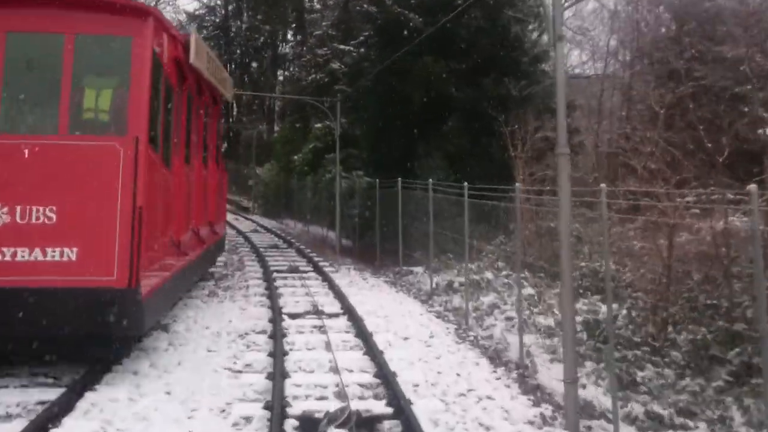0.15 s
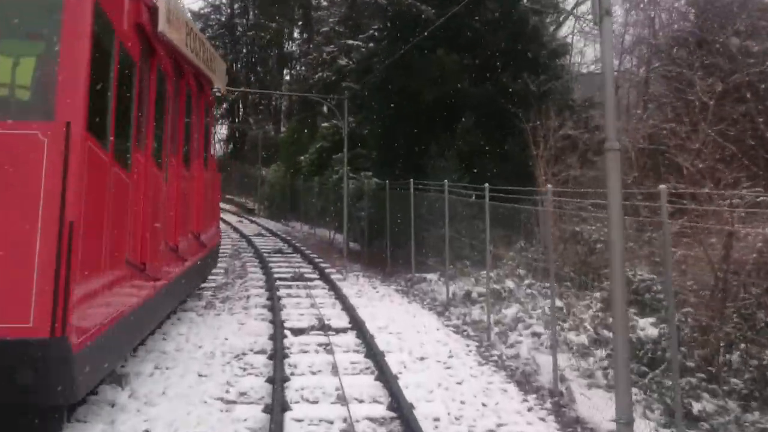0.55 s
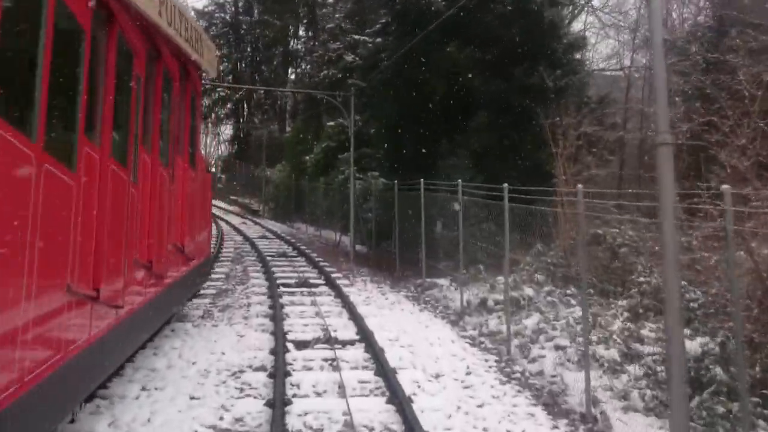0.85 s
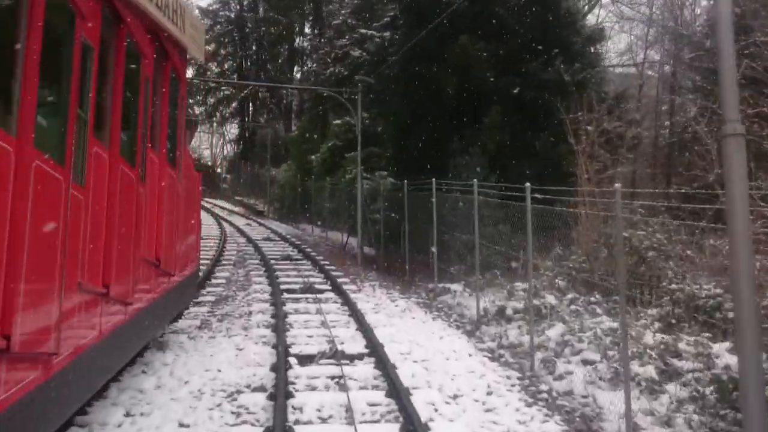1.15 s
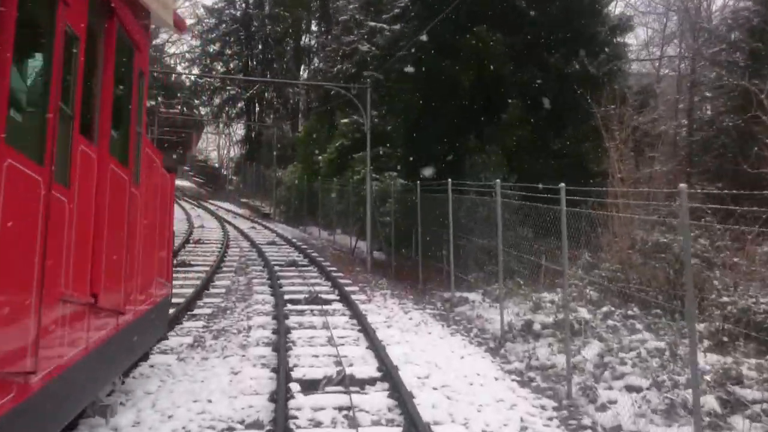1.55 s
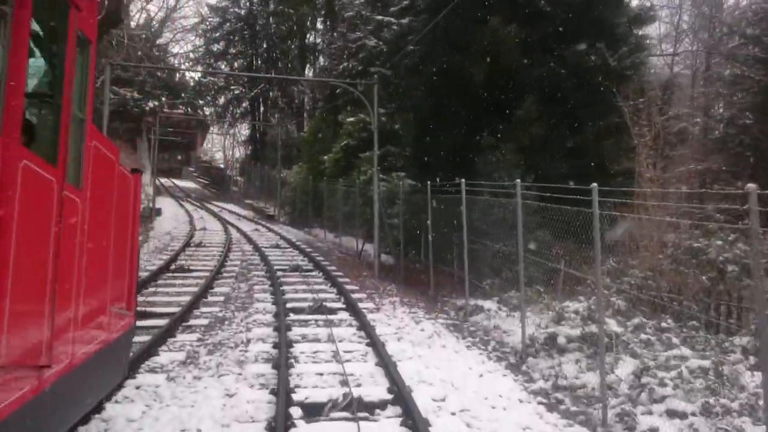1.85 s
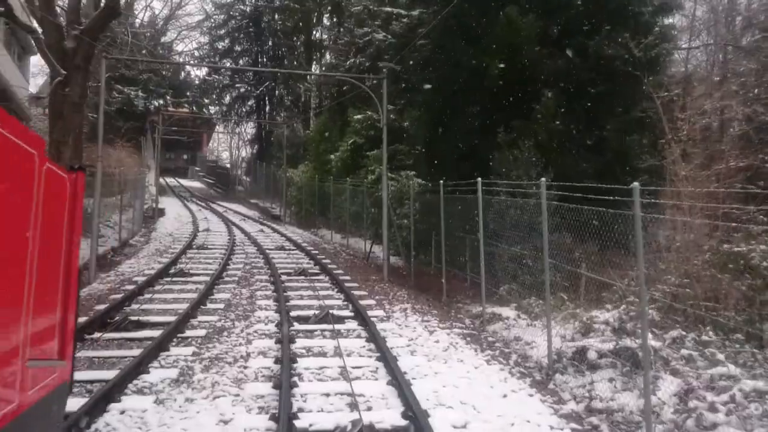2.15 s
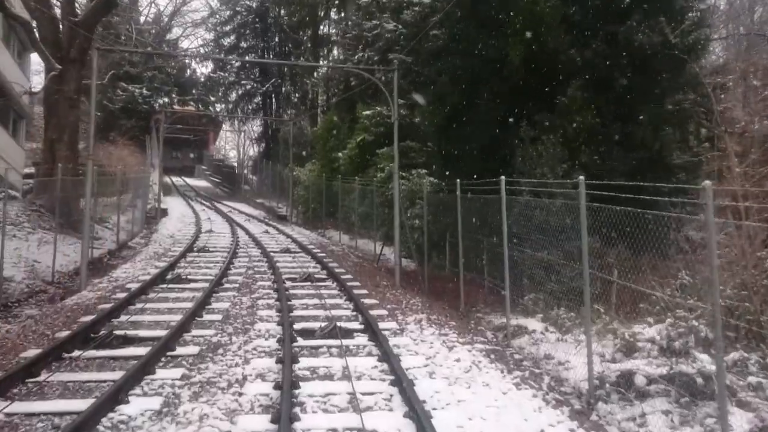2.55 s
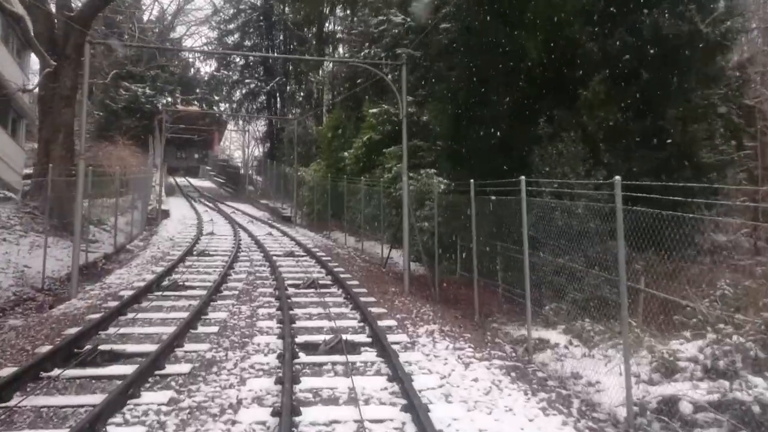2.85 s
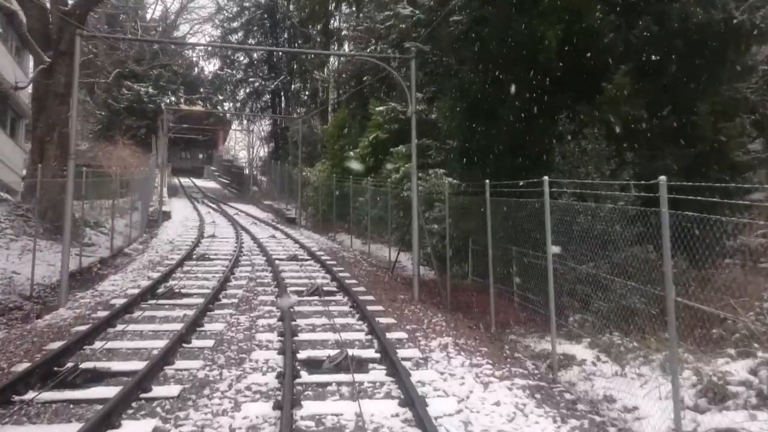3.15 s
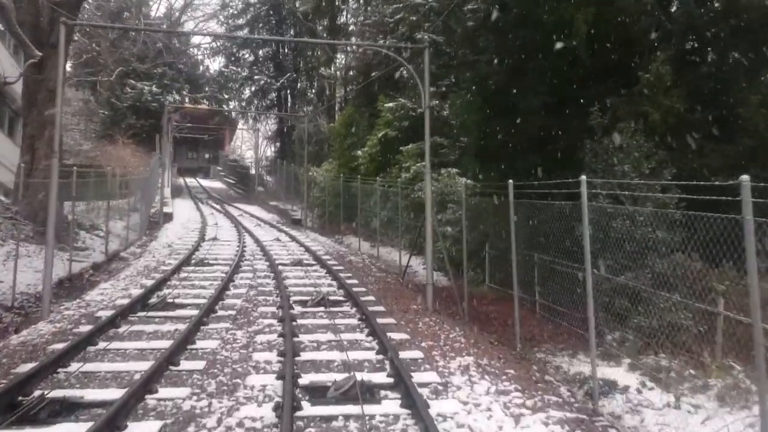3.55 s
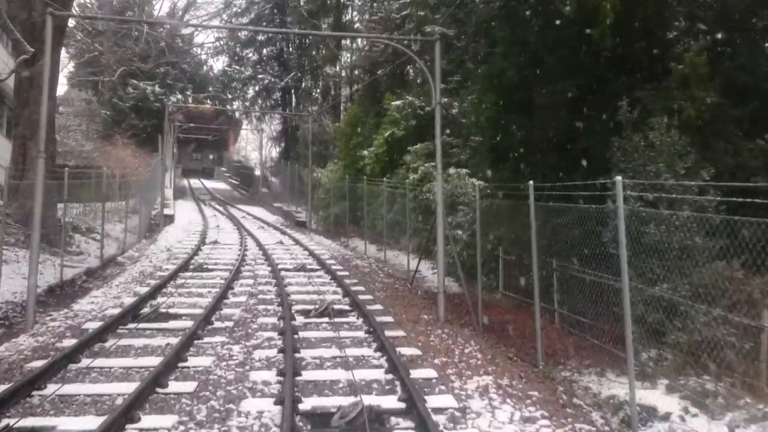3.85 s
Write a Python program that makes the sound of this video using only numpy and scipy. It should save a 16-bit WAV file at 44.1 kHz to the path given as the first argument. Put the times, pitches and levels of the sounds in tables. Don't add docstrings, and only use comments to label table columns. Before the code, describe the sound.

Gusty wind blows hard into the microphone while a rail car rolls quietly by behind it

```python
import sys
import numpy as np
from scipy import signal
from scipy.fft import rfft, irfft
from scipy.io import wavfile
from scipy.ndimage import uniform_filter1d

SR = 44100
rng = np.random.default_rng(int(sys.argv[2]) if len(sys.argv) > 2 else 0)


def waveform_to_disk(signal):
    frames = np.transpose(np.atleast_2d(signal))
    scaled = np.clip(frames, -1, 1) * 32767
    samples = np.round(scaled).astype(np.int16)
    wavfile.write(sys.argv[1], SR, samples)


def voltage_ratio(level):
    return 10 ** (np.asarray(level, float) / 20)


N = 176400

# (time [s], level [dB])
NEAR = [
    (0, 0),
    (.4, 0.5),
    (1.6, 1.5),
    (2.3, 1),
    (2.75, -1),
    (3.6, -2.5),
    (4, -6),
]


def evened(x):
    return x / np.sqrt(np.mean(x ** 2) + 1e-20)


def read(points, hz):
    f, value = np.transpose(points)
    return np.interp(np.log(hz + 1), np.log(f + 1), value)


def follow(points, axis=1):
    rows = np.array(points)
    return np.interp(np.arange(N) / SR, rows[:, 0], rows[:, axis])


def drift(hz):
    spectrum = rfft(rng.standard_normal(N))
    slow_only = np.exp(-(np.fft.rfftfreq(N, 1 / SR) / hz) ** 2)
    return evened(irfft(spectrum * slow_only, N))


def add(mix, s, sound):
    part = mix[max(round(s * SR), 0):][:len(sound)]
    part += sound[:len(part)]


def resonate(x, hz, width):
    r = np.exp(-np.pi * width / SR)
    return signal.lfilter([1 - r * r, 0, r * r - 1], [2, -4 * r * np.cos(2 * np.pi * hz / SR), 2 * r * r], x)


def resonate_twice(x, hz, width):
    return resonate(resonate(x, hz, width), hz, width)


def eddies(events, trim_db, turns, pitch):
    out = np.zeros(N)
    for (s, db, hz), phase in zip(events, rng.random(len(events))):
        u = np.arange(-3 / hz, 3 / hz, 1 / SR) * hz
        wave = np.exp(2j * np.pi * phase) / (1 - 2j * np.pi * pitch * u / turns) ** (turns + 1)
        add(out, s - 3 / hz, voltage_ratio(db + trim_db) * np.hanning(len(u)) * wave.real)
    return out


def port_wind(gust, thumps, flaps):
    hz = np.fft.rfftfreq(4 * N, 1 / SR)
    tilt = voltage_ratio(-7 * hz / 125.6) * hz / (hz + 40)
    pattern = evened(irfft(rfft(rng.standard_normal(4 * N)) * tilt))

    speed, wobble, t = follow(gust, axis=2), drift(hz=120), np.arange(N) / SR
    rush = np.tanh(sum(np.exp(-((t - s) / .007) ** 2) for s, db, f in flaps))
    step = speed * np.exp(.16 * speed * wobble + .25 * rush)
    place = np.cumsum(np.clip(step, 0, 3.9))

    lumps_db = 1.5 * drift(hz=21.6) + 2.44 * wobble + 4.3 * rush
    air = evened(np.interp(place, np.arange(4 * N), pattern) * voltage_ratio(lumps_db))
    air = voltage_ratio(follow(gust) - 0.5) * air
    thumping = eddies(thumps, trim_db=-1, turns=7.0, pitch=0.84)
    flapping = eddies(flaps, trim_db=3, turns=2.3, pitch=0.66)
    return air + thumping + flapping


def wind():
    # (time [s], wind pressure [dB], air speed [1 = stiff gust])
    gust_left = [(0, -20.5, 0.57), (.14, -32.5, 0.41), (.44, -21, 0.59), (.5, -15.5, 0.71),
                 (.64, -16.5, 0.79), (.72, -28.5, 0.55), (.98, -22, 0.61), (1.15, -18.5, 0.92),
                 (1.35, -15, .9), (1.75, -15.5, 1.05), (2.4, -14.5, 1.05), (2.47, -13.5, 0.82),
                 (2.72, -11.5, 1.05), (2.82, -22, 0.68), (3.1, -32.5, 0.55), (3.25, -21.5, 0.7),
                 (3.65, -23, 0.78), (4.0, -9.5, 0.48)]
    gust_right = [(0, -24, 0.39), (.4, -23.5, 0.6), (.76, -9.5, 0.61), (.96, -24.5, 0.45),
                  (1.01, -12.5, 0.57), (1.17, -44, 0.52), (1.33, -16.5, 0.47), (1.4, -18, 0.76),
                  (1.52, -13.5, 0.54), (1.8, -16.5, .6), (2.4, -13, 0.49), (2.97, -23.5, .5),
                  (3.01, -8, .8), (3.25, -15, 0.71), (3.6, -13, 0.86), (3.77, -15, 1.18), (3.87, -1, 1.29),
                  (3.94, -16.5, 0.65)]
    # (time [s], level [dB], pitch [Hz])
    thumps_left = [(0.505, -5.5, 110), (0.56, -4, 108), (1.171, -6, 99.6), (1.232, -4, 121),
                   (1.334, 0.5, 118), (1.376, -2.5, 128), (1.468, -7.5, 127), (1.6, -7, 135),
                   (1.666, 2, 126), (1.785, 0, 97), (1.824, -5.5, 133.4), (1.946, -6, 131),
                   (2.124, -6.5, 131.1), (2.202, -2, 128), (2.257, -9, 111), (2.375, -2.5, 145),
                   (2.5, -5, 153.4), (2.549, -1.5, 140), (2.601, -4, 118), (2.702, 0.5, 127.3),
                   (2.905, -7, 127.8), (3.724, -9.5, 87), (3.792, -4.5, 119.4), (3.899, -5, 112)]
    thumps_right = [(0.656, -10, 84), (0.757, -4.5, 113), (0.798, -3.5, 110), (0.851, -8, 96),
                    (1.095, -10, 91), (1.409, -4, 117), (1.611, -3.5, 85.4), (1.8, -2.5, 102.5),
                    (2.18, -16, 117), (2.294, -5, 102), (2.477, -9, 116), (2.625, -12, 90.2),
                    (3.025, 2.5, 105), (3.156, -5, 160), (3.203, -8.5, 111), (3.364, -3.5, 101.6),
                    (3.427, -3, 103.8), (3.507, -1.5, 106), (3.558, -15, 100), (3.602, 8, 95),
                    (3.727, -5, 131), (3.816, -6, 108.7), (3.872, -8, 136.3), (3.914, -4, 98.96)]
    # (time [s], level [dB], pitch [Hz])
    flaps_left = [(0.508, -12.0, 327), (0.596, -8.5, 363), (1.166, -16.5, 385), (1.189, -17, 405),
                  (1.222, -12.5, 450), (1.237, -10.5, 497), (1.249, -9, 540), (1.284, -11, 498.7),
                  (1.303, -13.0, 423), (1.366, -10, 375), (1.428, -18.5, 412), (1.463, -15, 413),
                  (1.507, -9.0, 387), (1.569, -15, 373), (1.586, -9.5, 495), (1.597, -3.5, 440),
                  (1.674, -4.5, 356), (1.692, -4.0, 474), (1.731, -11.0, 515), (1.827, -10, 366.5),
                  (1.846, -6, 350), (1.878, -17, 450), (1.904, -16, 375), (1.938, -4.5, 520.6),
                  (1.984, -10, 372), (2.009, -15, 415), (2.083, -7, 386.5), (2.096, -5.0, 387),
                  (2.11, -10.5, 410), (2.138, -13, 382), (2.203, -13, 396), (2.218, -11.5, 362),
                  (2.241, -6, 418), (2.342, -11, 338), (2.352, -7.5, 342.4), (2.374, -7.0, 405),
                  (2.389, -3.5, 430.3), (2.407, -13, 369), (2.537, -6.5, 351.7), (2.56, -9, 399),
                  (2.575, -4.5, 384), (2.637, -10, 404), (2.67, -12, 493), (2.692, -8, 365),
                  (2.734, -9, 426), (2.751, -16.5, 324)]
    flaps_right = [(0.416, -16.5, 355), (0.736, -10, 391), (1.381, -12, 367), (1.823, -18.0, 359),
                   (3.026, -5, 335), (3.036, -5.5, 438), (3.056, -13, 362), (3.16, -13, 374),
                   (3.195, -23.5, 375), (3.229, -13, 371), (3.282, -16, 342), (3.337, -9.5, 355),
                   (3.357, -11, 382), (3.409, -5, 453), (3.429, -11.5, 435), (3.46, -13.5, 498),
                   (3.485, -4.5, 351), (3.505, -4.5, 424), (3.522, -13.5, 437), (3.535, -15, 407),
                   (3.578, -17, 387), (3.601, -8, 382), (3.628, -5.5, 355), (3.68, -14, 359),
                   (3.735, -17.0, 384), (3.783, -6.5, 471), (3.803, -0.5, 556), (3.809, -4.5, 560),
                   (3.824, -0.5, 565), (3.842, -9, 560), (3.85, -3.0, 459), (3.863, -2, 465),
                   (3.873, -6.5, 542), (3.884, -9.0, 494), (3.896, -11, 416), (3.913, -11, 328),
                   (3.953, -17, 441), (3.963, -11.5, 541), (3.987, -11.5, 318)]
    left = port_wind(gust_left, thumps_left, flaps_left)
    right = port_wind(gust_right, thumps_right, flaps_right)
    air = np.array([left, right])
    low_cut = signal.butter(4, 55.8, "high", fs=SR, output="sos")
    return signal.sosfilt(low_cut, air - .05 * air[::-1])


def rolling(shape, level_db, share, patchy_db, flicker_db):
    # (frequency [Hz], likeness [-1 to 1])
    likeness = [(300, -0.93), (550, -0.83), (1000, -0.31), (1700, 0.16), (2400, -0.23), (4000, 0.023)]
    # (frequency [Hz], left over right [dB])
    lean_left = [(300, -2), (1100, -4.7), (2900, .5), (4500, -2.5), (6200, -3.5), (12000, -.8)]
    frames, hz = N // 128 + 5, np.fft.rfftfreq(512, 1 / SR)
    a, b, c, d, patches = rng.standard_normal((frames, 257, 5)).T
    patches = uniform_filter1d(patches, size=5, axis=0)
    patches = evened(uniform_filter1d(patches, size=12, axis=1))

    same = np.clip(read(likeness, hz), -1, 1)[:, None]
    left = a + 1j * b
    right = same * left + np.sqrt(1 - same ** 2) * (c + 1j * d)
    lean = .5 * read(lean_left, hz)
    tone_db = np.array([lean, -lean])[:, :, None] + read(shape, hz)[:, None] + patchy_db * patches
    edge = (hz >= shape[0][0]) * np.minimum(1, (shape[-1][0] / (hz + 1)) ** 3)
    z = np.array([left, right]) * voltage_ratio(tone_db) * edge[:, None]
    out = evened(signal.istft(z, nperseg=512, noverlap=384)[1][:, :N])
    return out * voltage_ratio(level_db + share * follow(NEAR) + flicker_db * drift(hz=24.4))


def wheel_rumble():
    # (frequency [Hz], level [dB])
    rumble_tone = [(60, -7.5), (200, -18.5), (500, -24), (1000, -27), (1750, -31.5), (2050, -38),
                   (2500, -36), (3200, -44.5)]
    return rolling(rumble_tone, level_db=-34.5, share=0.6, patchy_db=1.8, flicker_db=0.03)


def rail_singing():
    # (frequency [Hz], level [dB])
    singing_tone = [(3300, 2.5), (4800, -9.5), (5500, 1), (6300, 3), (7300, -4), (9000, -12),
                    (12000, -24.5), (15500, -22.5)]
    return rolling(singing_tone, level_db=-59, share=1.4, patchy_db=2.0, flicker_db=0.53)


def rollers():
    # (pitch [Hz], width [Hz], level [dB])
    hums = [
        (692, 64, -64.5),
        (917, 16, -67),
        (1173, 33, -61),
        (1712, 220, -57),
    ]
    out = np.zeros((2, N))
    for hz, width, db in hums:
        hum = evened(resonate_twice(rng.standard_normal((2, N)), hz, width))
        fade_db = (hz > 1500) * follow(NEAR)
        out += voltage_ratio(db + 4.4 * drift(hz=2.3) + fade_db) * hum
    return out * voltage_ratio([[-2.5], [2.5]])


def ticks():
    # (time [s], level [dB], ring pitch [Hz], time to fade 60 dB [s])
    metal_ticks = [(0.2738, -29.5, 6300, 0.2), (0.2742, -40.5, 3580, 0.066), (0.4254, -46, 8200, .03),
                   (0.825, -41, 5740, 0.051), (0.921, -66.5, 14470, 0.041), (1.05, -49, 7330, .02),
                   (1.152, -49, 9000, .05), (1.378, -42.5, 6400, .08), (1.667, -56.5, 13550, .02),
                   (2.029, -33, 6105, 0.1), (2.162, -44.5, 6100, 0.049), (2.1835, -59.5, 12480, 0.018),
                   (3.021, -59, 11600, 0.021), (3.167, -49.5, 7600, .01), (3.597, -55.5, 11990, .03)]
    out, t = np.zeros((2, N)), np.arange(8000) / SR
    for s, db, hz, t60 in metal_ticks:
        noise = rng.standard_normal((2, len(t)))
        fade = voltage_ratio(-60 * t / .014) + voltage_ratio(-10.5 - 60 * t / (1.1 * t60))
        ring = evened(resonate_twice(noise, hz, 0.32 * hz))
        click = .17 * noise * voltage_ratio(-60 * t / .009)
        sound = voltage_ratio(db) * (ring * fade * .6 + click)
        for ear, trim_db in enumerate((-1.2, 1.2)):
            add(out[ear], s, voltage_ratio(trim_db) * sound[ear])
    return out


def squeal():
    middle_s, span_s = 0.87, 0.11
    rub = evened(resonate_twice(rng.standard_normal((2, N)), hz=5430, width=220))
    swell = np.exp(-((np.arange(N) / SR - middle_s) / span_s) ** 4)
    return rub * voltage_ratio(-61.5 + 3.7 * drift(hz=40)) * swell


def knocks():
    # (time [s], level [dB])
    joints = [
        (2.07, -40.5),
        (2.329, -42),
        (2.574, -37.5),
        (2.823, -40.5),
        (3.099, -42.5),
    ]
    # (pitch [Hz], width [Hz], level [dB])
    rail_notes = [
        (1116, 230, -1),
        (1629, 120, -4.5),
        (2470, 220, -14),
        (3290, 330, -18.5),
    ]
    out, t = np.zeros((2, N)), np.arange(6000) / SR
    for s, db in joints:
        blow = rng.standard_normal((2, len(t))) * np.minimum(t / 0.0031, 1) * voltage_ratio(-60 * t / 0.24)
        ring = np.zeros_like(blow)
        for hz, width, note_db in rail_notes:
            note = resonate(resonate(blow, hz, 3.7 * width), hz, width)
            ring += voltage_ratio(note_db) * note / np.sqrt(width / 60)
        for ear in range(2):
            add(out[ear], s, voltage_ratio(db + 25.5 + 6.1 * ear) * ring[ear])
    return out


def snaps():
    # (time [s], level [dB])
    hits = [
        (3.8015, -7),
        (3.8294, -12),
        (3.8504, -12),
        (3.8638, -5),
        (3.8725, -9),
        (3.8968, -10),
    ]
    out, t = np.zeros(N), np.arange(-60, 60) / SR
    for s, db in hits:
        add(out, s - 60 / SR, voltage_ratio(db) * np.exp(-abs(t) / .00032))
    return signal.sosfilt(signal.butter(2, 5200, fs=SR, output="sos"), out)


def scene():
    track = wheel_rumble() + rail_singing() + rollers() + ticks() + squeal() + knocks()
    return wind() + track


def top_cut(x):
    return signal.sosfilt(signal.butter(12, 15750, fs=SR, output="sos"), x)


def record(dry):
    duck_from_db, recover_db_per_s, stop = -11, 22, .87
    power_db = 10 * np.log10(abs(uniform_filter1d((dry ** 2).mean(0), size=800)) + 1e-12)
    fall = np.arange(N) * recover_db_per_s / SR
    held_db = np.maximum.accumulate(power_db + fall) - fall
    over_db = np.maximum(held_db - duck_from_db, 0)
    held = dry / voltage_ratio(0.26 * uniform_filter1d(over_db, size=400))
    squeezed = held / (1 + (abs(held) / stop) ** 6) ** (1 / 6)
    clicking = squeezed + [[0], [1]] * snaps()
    return top_cut(np.clip(clicking, -stop, stop))


dry = scene()
out = record(dry)
waveform_to_disk(out)
```